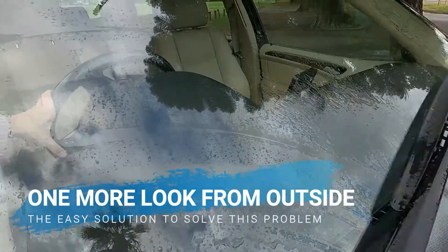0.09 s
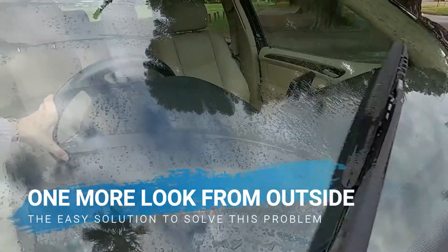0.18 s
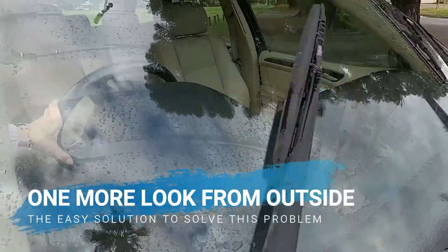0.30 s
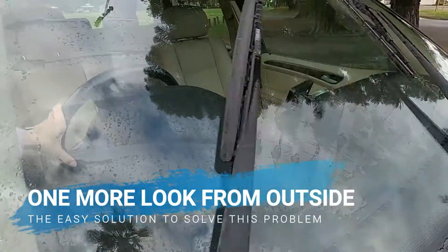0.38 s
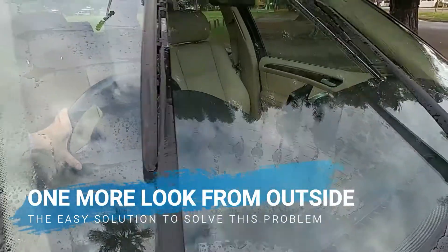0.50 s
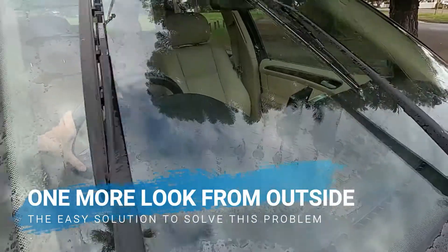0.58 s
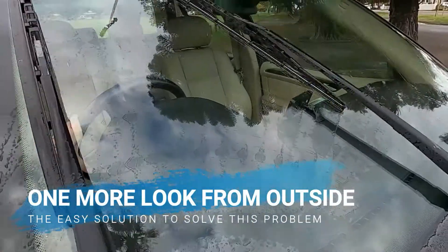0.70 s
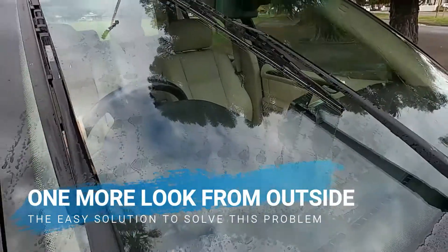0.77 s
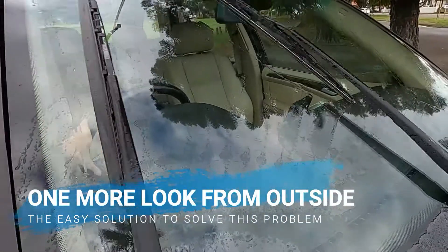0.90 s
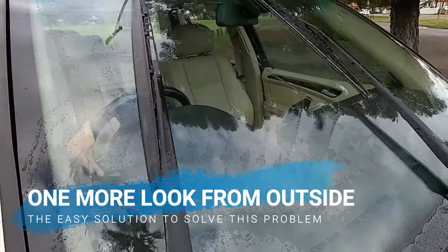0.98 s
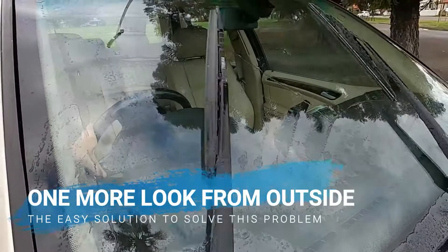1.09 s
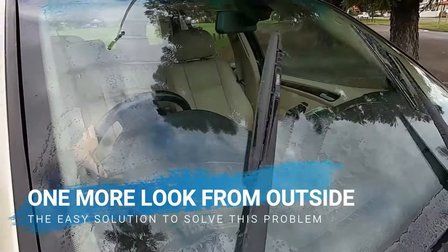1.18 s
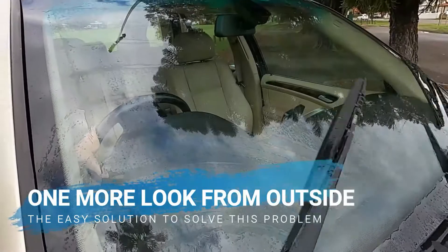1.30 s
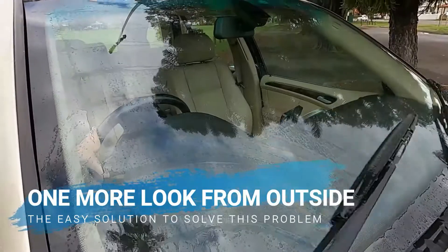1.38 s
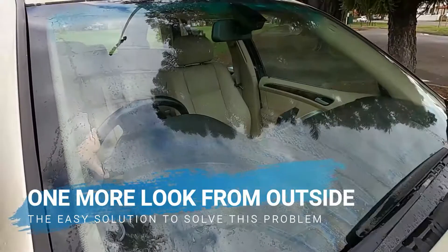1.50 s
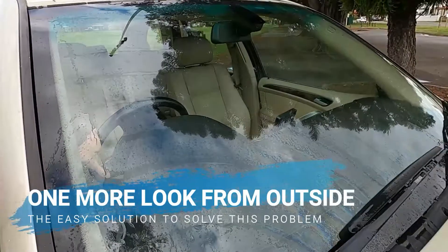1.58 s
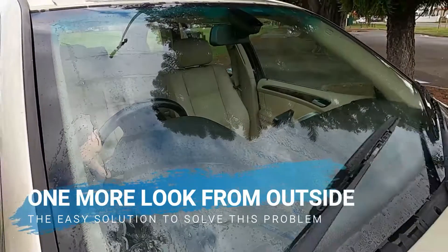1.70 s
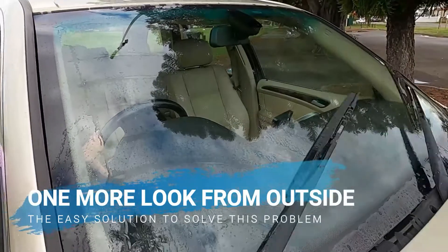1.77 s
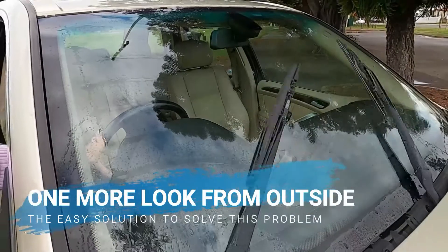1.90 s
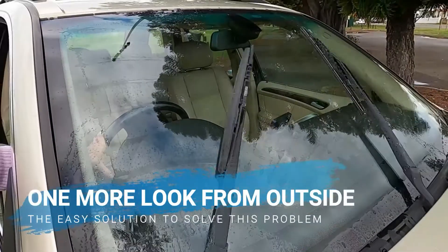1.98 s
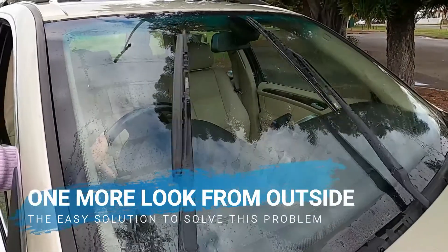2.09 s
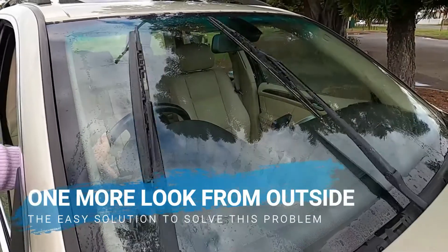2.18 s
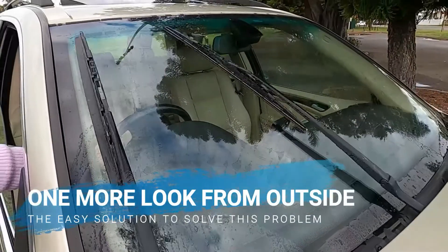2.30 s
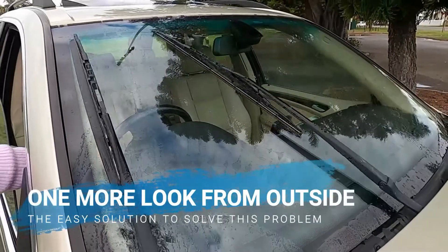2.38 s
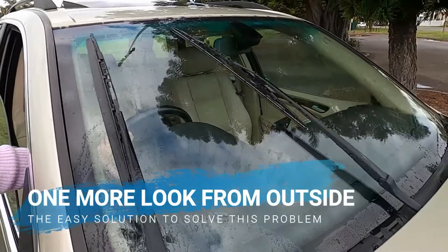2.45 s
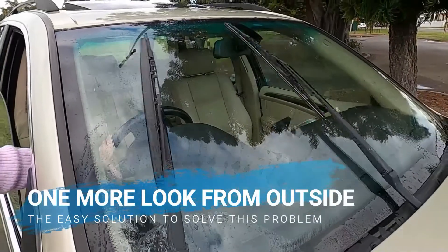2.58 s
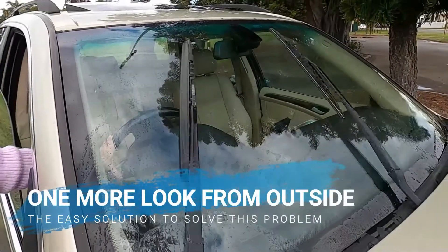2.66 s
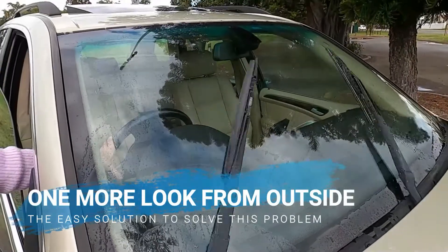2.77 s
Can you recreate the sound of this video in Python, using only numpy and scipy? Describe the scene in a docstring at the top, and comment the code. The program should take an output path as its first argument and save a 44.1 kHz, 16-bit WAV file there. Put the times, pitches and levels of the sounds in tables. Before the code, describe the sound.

Windscreen wiper blades judder and slap across barely wet glass in two booming, fluttering sweeps

```python
"""Two sweeps of car wipers slap and flutter over a barely wet windscreen, heard from just outside.
The rubber grips and lets go: the blades are damped and shuddering tones, the booming glass a set of
resonances, and the crackling, squeaking edges are tiny chirps and short bursts of shaped noise.
Between the sweeps and after the second, the arms tick and the linkage knocks softly, as short decaying
rings. Low rumble and outdoor air, both shaped noise, lie underneath."""
import sys
import numpy as np
from scipy import signal
from scipy.fft import rfft, irfft, next_fast_len
from scipy.io import wavfile
from scipy.ndimage import map_coordinates

SR = 44100
rng = np.random.default_rng(int(sys.argv[2]) if len(sys.argv) > 2 else 0)


def file_out(sig):
    """Save sig as 16-bit WAV at sys.argv[1]."""
    # one column per channel
    cols = np.atleast_2d(sig).T
    # limit, then scale
    lim = np.clip(cols, -1, 1)
    pcm = np.round(lim * 32767).astype(np.int16)
    wavfile.write(sys.argv[1], SR, pcm)


N = 125685  # length in samples

# Loudness of the low rumble over time. Each row: time in seconds, level in dB.
RUMBLE_LEVEL = [(0, -43), (.95, -38), (1.48, -37.5), (1.67, -43.5), (1.85, -34), (2.85, -36.5)]
# Tone colour of the rumble. Each row: frequency in Hz, relative level in dB.
RUMBLE_COLOUR = [(15, -42), (35, 0), (70, -1.5), (110, 3), (160, -5.5), (210, -9), (250, -10), (320, -18.5),
                 (450, -24), (900, -74)]
# Tone colour of the outdoor air. Each row: frequency in Hz, relative level in dB.
AIR_COLOUR = [(100, 8), (400, -3), (900, 0.5), (1400, -2.5), (2200, -14), (3200, -15), (5000, -23.5),
              (8000, -34.5), (12000, -49), (15000, -68)]
# Tone colour of the hiss of the gliding blade. Each row: frequency in Hz, relative level in dB.
WET_COLOUR = [(2000, 3), (4000, -0.5), (9000, -8.5), (13000, -17), (15500, -19)]
# Windscreen resonances. Each row: frequency in Hz, relative level in dB, time to fall 60 dB in seconds.
GLASS_MODES = [(65.4, -4, 0.13), (102.5, 1.5, 0.15), (116.8, -2.5, 0.29), (155.6, 0.5, 0.13),
               (195.6, -5, 0.14), (247, -5.5, 0.19), (295.7, -8, 0.15), (336.3, -9, 0.11),
               (406.5, -11, 0.079), (473, -17, 0.062)]
# Soft knocks of the linkage. Each row: start in seconds, level in dB.
LINKAGE_KNOCKS = [(1.039, -32.5), (1.067, -32.5), (1.136, -30), (1.295, -29), (1.362, -29.5), (1.413, -39),
                  (1.479, -30.5), (1.592, -37), (1.783, -30.5), (2.658, -32.5), (2.778, -28.5)]
# Ringing of a metal arm. Each row: frequency in Hz, relative level in dB, time to fall 60 dB in seconds.
ARM_MODES = [(2856, -13, 0.074), (3380, -14.5, 0.029), (3620, -18, 0.056), (4000, -17, 0.049),
             (4330, -18, 0.086)]
# Ticks of the arms. Each row: start in seconds, level in dB before TICK_DB, centre of the pitch in Hz.
TICK_EVENTS = [(0.979, -43, 3250), (1.036, -33.5, 8670), (1.0383, -34, 4240), (1.0775, -44, 8100),
               (1.116, -37, 7800), (1.123, -34.5, 3060), (1.381, -40.5, 2840), (1.457, -37.5, 7100),
               (1.5015, -40, 7400), (1.602, -41.5, 5530), (1.78, -40, 6200), (1.834, -33, 6500),
               (2.582, -41.5, 3420), (2.6612, -38.5, 8330), (2.829, -43.5, 7500)]
# Dull clacks of the blade's frame. Each row: start in seconds, level in dB.
FRAME_CLACKS = [(.386, -30), (.56, -38), (.629, -39), (.717, -34), (.882, -34), (1.903, -33), (2.013, -36)]
# Squeaks of the rubber. Each row: start in seconds, length in seconds, level in dB, centre of the
# pitch in Hz, share of tone from 0 to 1.
RUBBER_SQUEAKS = [(.3525, 0.0041, -28, 2900, 1), (.373, 0.016, -33, 2970, 0.85),
                  (1.9035, 0.0037, -32, 2890, 0.82), (1.978, 0.0027, -35, 5090, 0.4),
                  (1.9995, 0.003, -26, 3030, 0.81), (2.3626, 0.005, -37, 5640, 0.56)]
# Scratches as the edge catches and tears free. Each row: start in seconds, length in seconds, level in dB.
EDGE_CATCHES = [(.279, .003, -32.5), (.307, 0.0047, -34.5), (.316, 0.0019, -30), (.328, .002, -42),
                (.414, 0.011, -37.5), (.466, 0.00096, -30), (.479, 0.0026, -36.5), (.5213, 0.0028, -34.5),
                (.594, 0.0029, -38), (.6285, 0.0018, -42.5), (.649, 0.0029, -37.5), (.664, .003, -43.5),
                (.677, 0.0025, -43), (.7155, 0.0031, -43.5), (.750, 0.0013, -34.5), (.773, 0.0098, -40.5),
                (.806, 0.0038, -39.5), (.8215, 0.0038, -37), (.865, 0.0091, -36.5), (.882, 0.0085, -35),
                (1.923, 0.0025, -40), (1.962, 0.0031, -35), (2.074, 0.0057, -40), (2.089, 0.0024, -36.5),
                (2.251, 0.0044, -43), (2.278, 0.0057, -47), (2.386, 0.0017, -41), (2.403, .004, -36.5),
                (2.4205, 0.0047, -36), (2.452, 0.0052, -34.5), (2.479, 0.0027, -33.5), (2.505, 0.0087, -38),
                (2.5327, 0.0033, -40.5)]
# Loudness of the crackle at the rubber's edge. Each row: time in seconds, level in dB.
CRACKLE_LEVEL = [(0, -69), (.2, -56), (.28, -45), (.385, -31.5), (.45, -43), (.5, -50.5), (.59, -46.5),
                 (.69, -58.5), (.78, -45.5), (.85, -56.5), (.94, -77), (1.72, -71), (1.86, -51),
                 (1.99, -39.5), (2.08, -44.5), (2.17, -56), (2.25, -53), (2.35, -54), (2.39, -48),
                 (2.5, -47.5), (2.57, -90)]
# Tone colour of the rubber's edge. Each row: frequency in Hz, relative level in dB.
EDGE_COLOUR = [(500, 8.5), (1500, -12), (2200, -1.5), (2900, 5.5), (3500, 2.5), (5200, -0.5), (7000, -3.5),
               (9000, -6.5), (11000, -14), (12500, -17), (14500, -27), (15700, -50)]
# Loudness of the rubbing midrange. Each row: time in seconds, level in dB.
RUB_LEVEL = [(0, -51), (.18, -49.5), (.24, -34.5), (.37, -32.5), (.48, -43), (.73, -51.5), (.9, -52.5),
             (.97, -63), (1.75, -56.5), (1.87, -42.5), (1.98, -34), (2.06, -40), (2.2, -58), (2.48, -46.5),
             (2.6, -65)]
# Tone colour of the rubbing. Each row: frequency in Hz, relative level in dB.
RUB_COLOUR = [(100, -58), (250, -1), (400, -2.5), (600, -0.5), (1000, -9), (1600, -15.5), (2500, -19.5),
              (5000, -61)]
# Strength of the small slips. Each row: time in seconds, level in dB before JUDDER_DB.
JUDDER_LEVEL = [(0, -55), (.13, -39.5), (.25, -23), (.37, -16), (.47, -25), (.75, -29.5), (.88, -29),
                (.97, -40.5), (1.72, -58), (1.84, -30.5), (1.98, -18), (2.2, -29), (2.53, -26.5),
                (2.64, -47.5)]
# Moments of blade flutter. Each row: start in seconds, length in seconds, level in dB before
# FLUTTER_SHAKE_DB, start pitch in Hz, end pitch in Hz; both pitches before FLUTTER_WAVER.
FLUTTER_EVENTS = [(0.401, .066, -13.5, 106.6, 161), (.48, 0.039, -13.5, 142, 137.6),
                  (0.52, 0.066, -14.5, 118.6, 119.3), (0.588, 0.041, -13, 122, 107),
                  (2.151, 0.055, -16, 126.3, 99.6), (2.365, 0.08, -22, 117.2, 111)]
# Hardest slaps of a blade. Each row: start in seconds, level in dB before the part's own level, bounce in Hz.
SLAP_EVENTS = [(.225, -10, 236), (.247, -11, 242), (0.273, -9, 139), (0.295, -12.5, 192),
               (.318, -10.5, 230), (.351, -7, 160), (.373, -11, 124), (0.632, -15.5, 103),
               (0.655, -11, 107), (.69, -12.5, 105), (.721, -10.5, 117), (.740, -12.5, 112),
               (.829, -18.5, 111), (0.896, -23, 252), (0.985, -16.5, 134), (1.867, -18.5, 234),
               (1.886, -11.5, 197), (1.917, -16, 175), (1.939, -11, 153), (1.973, -7.5, 147),
               (1.999, -12.5, 117), (2.019, -11, 129), (2.057, -6.5, 145), (2.085, -15, 114),
               (2.112, -15.5, 110), (2.212, -17, 105), (2.236, -13, 115), (2.269, -17, 119),
               (2.305, -14, 112), (2.349, -11.5, 112), (2.445, -13.5, 114), (2.571, -20, 122)]

# names ending in _T60 are seconds to fall by 60 dB; WAVER is a share of the pitch
AIR_DB = -52.5
OPENING_HISS_DB, OPENING_HISS_S = -58.5, 0.21
WHISTLE_HZ, WHISTLE_DB, WHISTLE_S, WHISTLE_WAVER = 3310, -53, 0.13, 0.045
KNOCK_T60 = 0.3  # on top of the glass's own decay
TICK_DB, TICK_CRACK_DB, TICK_COLOUR_DB, TICK_T60, TICK_WAVER = -7.5, -6.5, -5, 0.037, 0.08
CLACK_T60 = 0.065
SQUEAK_FALL_S, SQUEAK_WAVER = 0.0018, 0.101
CATCH_HZ, CATCH_OCTAVES, CATCH_RING_DB = 4690, 0.2, -6
CHIRPS_PER_S, CHIRP_HZ, CHIRP_OCTAVES, CHIRP_SPREAD_DB = 800, 5596, 0.788, 5.5
CHIRP_CYCLES, CHIRP_RISE = 2.5, 0.0071  # cycles to the loudest point; upward bend of the pitch
GRAINS_PER_S, GRAIN_SPREAD_DB, GRAIN_T60 = 380, 2, 0.0068
SNAP_DB, HISS_DB, CLUMP_DB = 1, -5, 3
SLIPS_PER_S, SLIP_SCATTER, SLIP_SPREAD_DB = 70, 0.356, 0.5  # scatter is a share of the slip spacing
JUDDER_DB = 1  # the small slips beside the slaps
FLUTTER_EDGE_S, FLUTTER_WAVER, FLUTTER_SHAKE_DB = 0.0061, 0.086, 1.5
SECOND_BEND_RATIO, SECOND_BEND_DB, OCTAVE_DB = 1.36, -10, -21  # the next bending mode beats with the first
SLAP_RISE_S, SLAP_POWER, SLAP_DB, SLAP_BOOM_DB = 0.0041, 1.01, -0.5, -20  # power bends the envelope
THUD_HZ, THUD_DB, THUD_T60 = 66, -17, 0.43
ECHO_DB, ECHO_T60 = -11, 0.11
LOW_CUT_HZ, TOP_HZ = 29, 15700


def amp(db):
    """Turn decibels into a gain."""
    return 10 ** (np.asarray(db) / 20)


def unit(x):
    """Scale a sound to an average (rms) strength of 1."""
    return x / np.sqrt(np.mean(x ** 2) + 1e-20)


def seconds(count):
    """The time of each sample."""
    return np.arange(count) / SR


def level(rows):
    """Gain for every sample, joining points of time in seconds and level in dB."""
    return amp(np.interp(seconds(N), *np.transpose(rows)))


def wobble(rate, count=N):
    """A smooth random curve with a given number of random points a second."""
    return map_coordinates(rng.standard_normal(8192), [seconds(count) * rate], mode="wrap")


def coloured(x, points):
    """Shape a sound's tone by points of Hz and dB, then bring it to rms 1."""
    m = next_fast_len(N + 8192)  # the spare room keeps the end from spilling onto the start
    hz, db = np.transpose(points)
    log_hz = np.log(np.fft.rfftfreq(m, 1 / SR) + 1)
    gain = amp(np.interp(log_hz, np.log(hz), db))
    return unit(irfft(rfft(x, m) * gain, m)[:N])


def noise(points):
    """Random noise with the given tone colour."""
    return coloured(rng.standard_normal(N), points)


def add(track, s, sound):
    """Mix a sound into the track at time s."""
    part = track[max(round(s * SR), 0):][:len(sound)]
    part += sound[:len(part)]


def ring(modes, spread_db=2.0):
    """One blow sets off fading tones, which share its strength differently each time."""
    t = seconds(SR // 4)
    out = np.zeros(len(t))
    for k, (hz, db, t60) in enumerate(modes):
        fade = amp(db + spread_db * rng.normal() - 60 * t / t60)
        out += (-1) ** k * fade * np.sin(2 * np.pi * hz * t)
    return out


def burst(t, length):
    """Loudness of one slip: nearly instant attack, hold, quick fall."""
    return np.minimum(t / 0.00021, 1) * np.exp(-np.maximum(t - length, 0) / SQUEAK_FALL_S)


def quaver(hz, count):
    """The unsteady tone of slipping rubber, at rms 1."""
    pitch = hz * (1 + SQUEAK_WAVER * wobble(726, count=count))
    return unit(np.sin(2 * np.pi * np.cumsum(pitch) / SR))


def background():
    """Low rumble, outdoor air and the fine hiss of the blade still gliding at the start."""
    rumble = noise(RUMBLE_COLOUR) * level(RUMBLE_LEVEL)
    air = amp(AIR_DB) * noise(AIR_COLOUR)
    glide = amp(OPENING_HISS_DB) * noise(WET_COLOUR) * np.exp(-(seconds(N) / OPENING_HISS_S) ** 2)
    return rumble + air + glide


def whistle():
    """The slowly gliding rubber whistles thinly at the start, wavers in pitch and fades."""
    pitch = WHISTLE_HZ * (1 + WHISTLE_WAVER * wobble(1420))
    tone = np.sin(2 * np.pi * np.cumsum(pitch) / SR)
    return amp(WHISTLE_DB) * tone * np.clip(1 - seconds(N) / WHISTLE_S, 0, 1)


def knocks():
    """The linkage takes up its slack and knocks softly through the lower tones of the glass."""
    out, t = np.zeros(N), seconds(SR // 4)
    for s, db in LINKAGE_KNOCKS:
        add(out, s, amp(db - 60 * t / KNOCK_T60) * ring(GLASS_MODES[:6], spread_db=3))
    return out


def ticks():
    """Play in the metal arms lets them tick, each time in another colour, and ring briefly."""
    out, t = np.zeros(N), seconds(SR // 4)
    crack = noise(EDGE_COLOUR)
    for s, db, hz in TICK_EVENTS:
        pitch = hz * (1 + TICK_WAVER * wobble(2530, count=len(t)))
        colour = amp(TICK_COLOUR_DB) * np.sin(2 * np.pi * np.cumsum(pitch) / SR)
        contact = amp(TICK_CRACK_DB) * np.roll(crack, rng.integers(N))[:len(t)] + colour
        tick = ring(ARM_MODES, spread_db=3.5) + amp(-60 * t / TICK_T60) * contact
        add(out, s, amp(db + TICK_DB) * tick)
    return out


def clacks():
    """A jerk of the blade rattles its frame for an instant: a fading piece of dull noise."""
    out, t = np.zeros(N), seconds(SR // 20)
    frame = noise(RUB_COLOUR)
    for k, (s, db) in enumerate(FRAME_CLACKS):
        add(out, s, amp(db - 60 * t / CLACK_T60) * frame[k * len(t):][:len(t)])
    return out


def squeaks():
    """A dry spot gives a squeak of a few milliseconds or more, part tone, part scratch."""
    out, t = np.zeros(N), seconds(SR // 20)
    scratch = noise(EDGE_COLOUR)
    for k, (s, length, db, hz, tonal) in enumerate(RUBBER_SQUEAKS):
        tone = np.sqrt(tonal) * quaver(hz, len(t))
        rough = np.sqrt(1 - tonal) * scratch[k * len(t):][:len(t)]
        add(out, s, amp(db) * burst(t, length) * (tone + rough))
    return out


def catches():
    """The edge catches and tears free: a broad scratch with a trace of pitch that always differs."""
    out, t = np.zeros(N), seconds(SR // 20)
    scratch = noise(EDGE_COLOUR)
    for k, (s, length, db) in enumerate(EDGE_CATCHES):
        hz = CATCH_HZ * 2 ** (CATCH_OCTAVES * rng.normal())
        colour = amp(CATCH_RING_DB) * quaver(hz, len(t))
        add(out, s, amp(db) * burst(t, length) * unit(scratch[k * len(t):][:len(t)] + colour))
    return out


def chirps():
    """Tiny squeaks a few cycles long, each at its own slightly rising pitch."""
    t = seconds(SR // 150)
    when, pitch, size = rng.random((4000, 3))[:int(CHIRPS_PER_S * N / SR)].T[:, :, None]
    # most pitches fall near the middle, a few far above or below
    octaves = CHIRP_OCTAVES * np.log(pitch / (1 - pitch)) / 2
    cycles = np.minimum(CHIRP_HZ * 2 ** octaves, SR / 3) * t
    u = cycles / CHIRP_CYCLES
    strength = amp(-CHIRP_SPREAD_DB * np.log(size + 0.097))  # a few are much louder
    grains = strength * u * np.exp(-u) * np.sin(2 * np.pi * cycles * (1 + CHIRP_RISE * u))
    at = (when * N).astype(int) + np.arange(len(t))
    return np.bincount(at.ravel(), grains.ravel(), minlength=N)[:N]


def edge(count=6):
    """The rubber's edge rubs and breaks loose in clumps of tiny chirps and snaps of several colours."""
    t = seconds(SR // 50)
    snaps = np.zeros(N)
    for _ in range(count):
        hits = rng.random(N) < GRAINS_PER_S / SR / count
        strength = amp(GRAIN_SPREAD_DB * np.minimum(rng.exponential(size=N), 4))
        snap = rng.standard_normal(len(t)) * amp(-60 * t / GRAIN_T60)
        snaps += signal.fftconvolve(hits * strength, snap)[:N]
    clumps = amp(CLUMP_DB * wobble(110))
    grains = coloured(chirps(), EDGE_COLOUR) + amp(SNAP_DB) * coloured(snaps, EDGE_COLOUR)
    crackle = unit(clumps * (grains + amp(HISS_DB) * noise(EDGE_COLOUR)))
    rub = unit(clumps * noise(RUB_COLOUR))
    return crackle * level(CRACKLE_LEVEL) + rub * level(RUB_LEVEL)


def judder():
    """Small uneven slips keep the glass booming throughout each sweep."""
    out = np.zeros(N)
    for k, (late, size) in enumerate(rng.standard_normal((300, 2))):
        s = (k + SLIP_SCATTER * late) / SLIPS_PER_S
        if s < N / SR:
            add(out, s, np.sign(size) * amp(SLIP_SPREAD_DB * size) * np.ones(1))
    boom = signal.fftconvolve(out, ring(GLASS_MODES, spread_db=3))[:N]
    return unit(boom) * level(JUDDER_LEVEL) * amp(JUDDER_DB)


def flutters():
    """The blade locks into a brief shudder in two beating modes, its pitch sliding and wavering."""
    out, t = np.zeros(N), seconds(SR // 4)
    for s, length, db, start_hz, end_hz in FLUTTER_EVENTS:
        slide = np.interp(t, [0, length], [start_hz, end_hz])
        hz = slide * (1 + FLUTTER_WAVER * wobble(104, count=len(t)))
        phase = 2 * np.pi * np.cumsum(hz) / SR
        gate = np.clip(np.minimum(t, length - t) / FLUTTER_EDGE_S, 0, 1)
        shake = amp(db + FLUTTER_SHAKE_DB * wobble(116, count=len(t)))
        second_bend = amp(SECOND_BEND_DB) * np.sin(SECOND_BEND_RATIO * phase)
        octave = amp(OCTAVE_DB) * np.sin(2 * phase)
        add(out, s, gate * shake * (np.sin(phase) + second_bend + octave))
    return out


def slaps():
    """Each slap is a few damped bounces of the blade, a thud of its arm and a boom of the glass."""
    out, t = np.zeros(N), seconds(SR // 4)
    u = t / SLAP_RISE_S
    for s, db, hz in SLAP_EVENTS:
        bounce = (u * np.exp(1 - u)) ** SLAP_POWER * np.sin(2 * np.pi * hz * t)
        thud = ring([(THUD_HZ, THUD_DB, THUD_T60)])
        boom = amp(SLAP_BOOM_DB) * ring(GLASS_MODES)
        add(out, s, amp(db) * (amp(SLAP_DB) * bounce + thud + boom))
    return out


def scene():
    """Mix all the sounds; the bright ones scatter briefly off the car's body as a fading echo."""
    t = seconds(SR // 4)
    bright = whistle() + ticks() + clacks() + squeaks() + catches() + edge()
    tail = rng.standard_normal(len(t)) * amp(-60 * t / ECHO_T60)
    echo = signal.fftconvolve(bright, tail / np.linalg.norm(tail))[:N]
    low = background() + knocks() + judder() + flutters() + slaps()
    return (bright + amp(ECHO_DB) * echo + low)[None]


def record(dry):
    """Fade the last instant, weaken the deepest bass and remove everything from TOP_HZ up."""
    m = next_fast_len(N + 8192)
    hz = np.fft.rfftfreq(m, 1 / SR)
    faded = dry * np.minimum(seconds(N)[::-1] / 0.0026, 1)
    low_cut = hz ** 4 / (hz ** 4 + LOW_CUT_HZ ** 4)
    return irfft(rfft(faded, m) * low_cut * (hz < TOP_HZ), m)[:, :N]


dry = scene()
out = record(dry)
file_out(out)
```